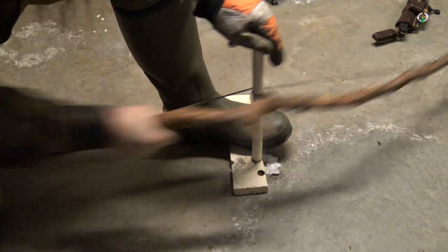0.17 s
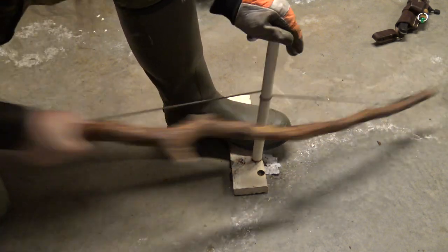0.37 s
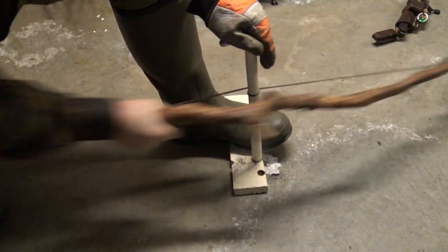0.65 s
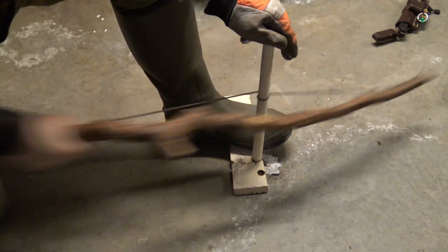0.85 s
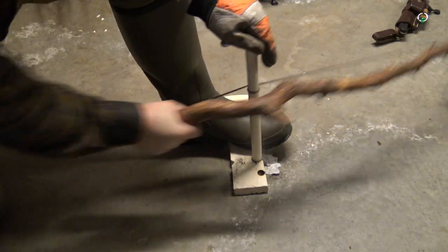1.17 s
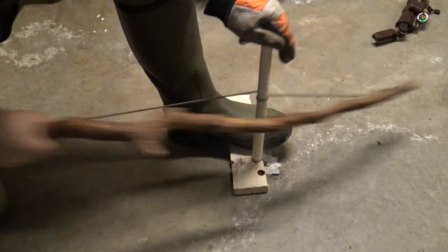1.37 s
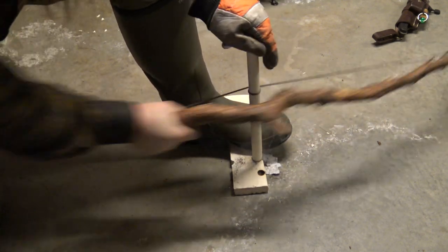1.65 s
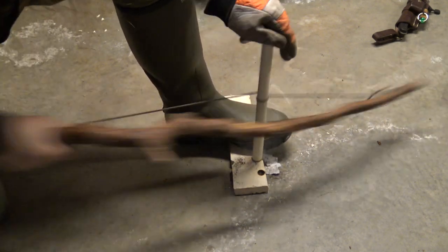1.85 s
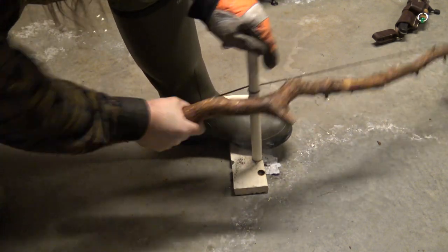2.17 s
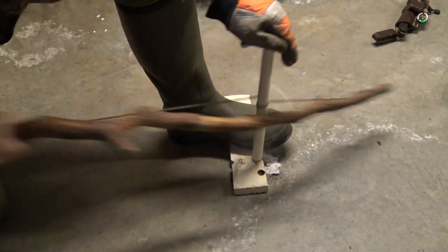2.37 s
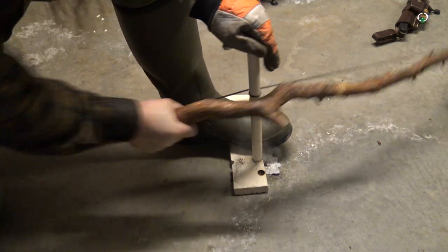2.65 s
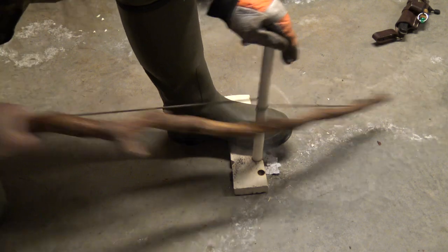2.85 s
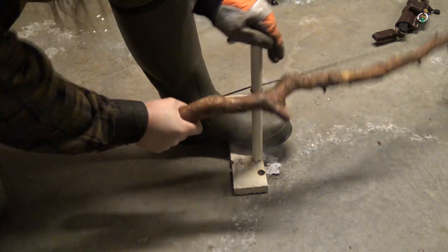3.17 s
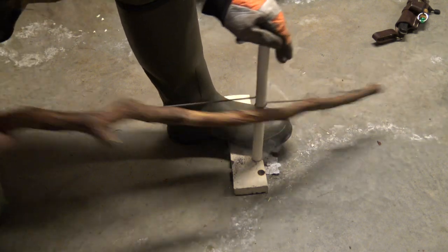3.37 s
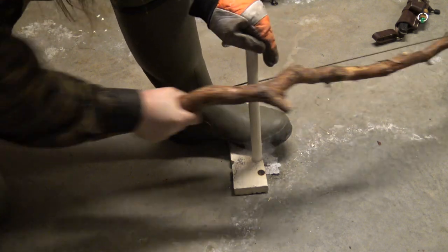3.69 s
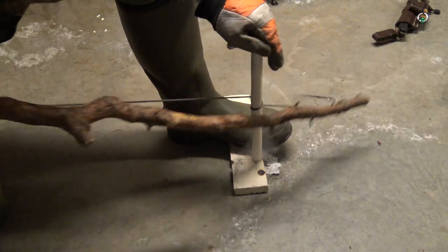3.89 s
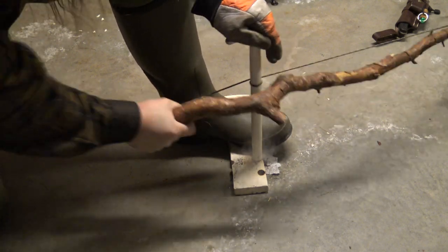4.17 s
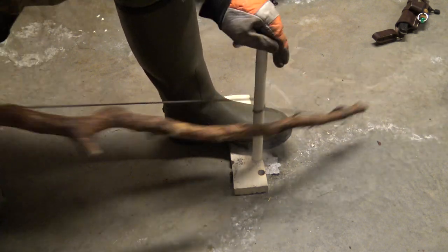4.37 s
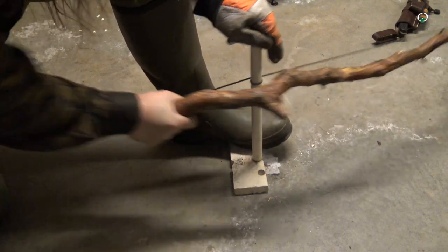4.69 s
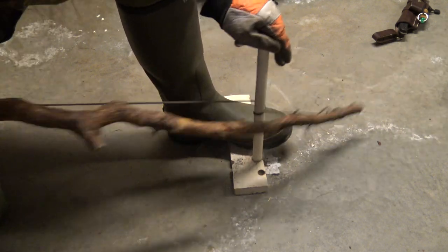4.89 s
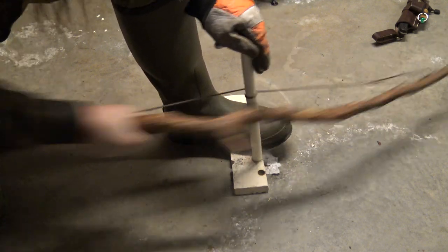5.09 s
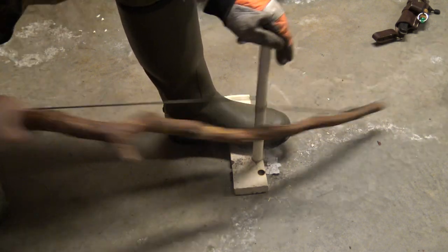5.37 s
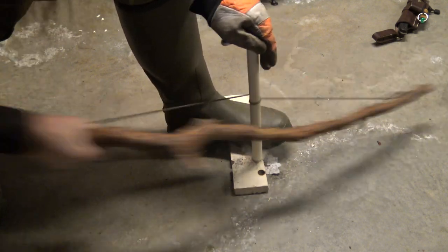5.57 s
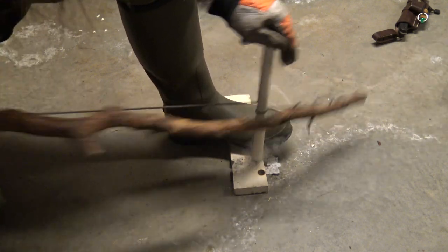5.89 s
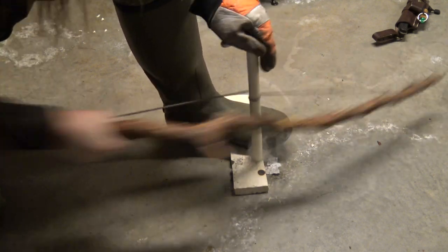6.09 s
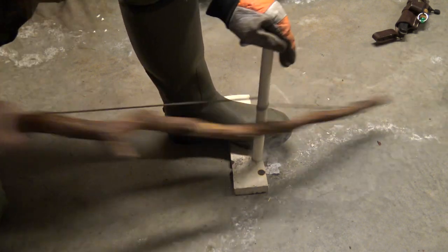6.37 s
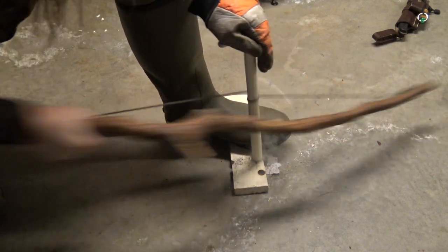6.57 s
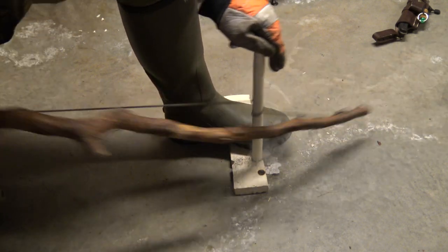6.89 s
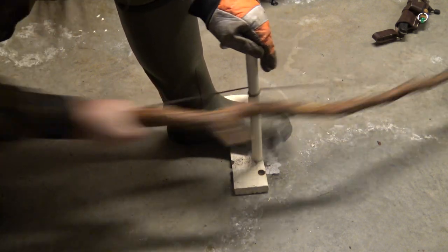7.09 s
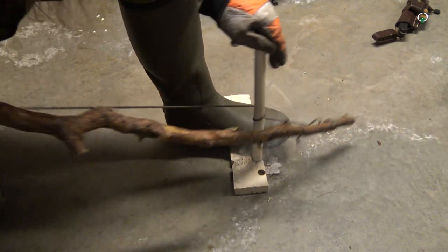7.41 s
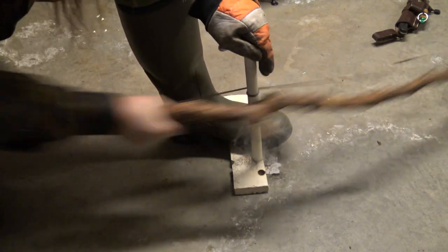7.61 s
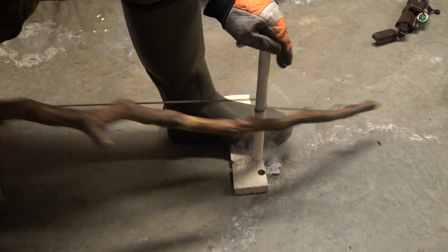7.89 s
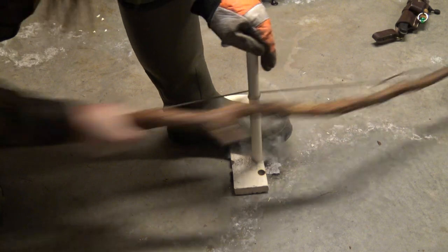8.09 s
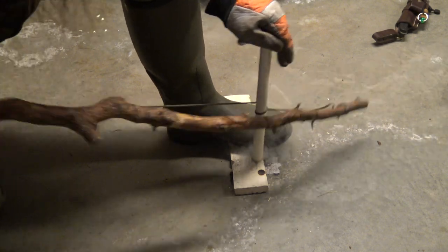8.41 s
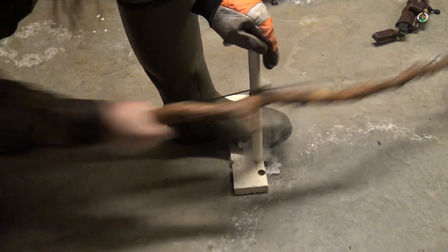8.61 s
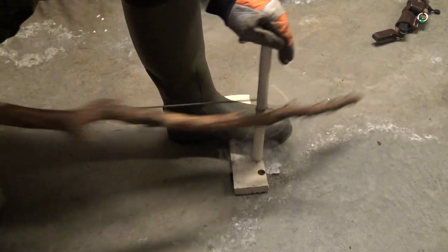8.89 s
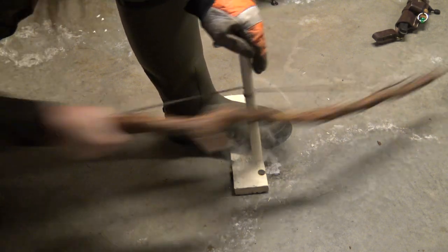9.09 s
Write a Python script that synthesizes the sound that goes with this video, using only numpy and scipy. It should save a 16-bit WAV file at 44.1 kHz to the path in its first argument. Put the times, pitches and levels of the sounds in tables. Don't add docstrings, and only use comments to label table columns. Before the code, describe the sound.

Steady, brisk sawing of wood on wood in a bare, hard room, microphone close. Each forward stroke starts with a faint airy whistle and usually breaks into a brief, raucous squeal; return strokes mostly just rasp. The earliest squeals are high and nearly pure, later ones lower, coarser and louder. A short falling groan comes near four seconds, small clicks afterward, with a short echo throughout.

```python
import sys
import numpy as np
from scipy import signal
from scipy.fft import rfft, irfft, next_fast_len
from scipy.io import wavfile
from scipy.ndimage import uniform_filter1d, minimum_filter1d, map_coordinates

SR = 44100
rng = np.random.default_rng(int(sys.argv[2]) if len(sys.argv) > 2 else 0)


def voltage_ratio(level):
    return 10 ** (np.asarray(level, float) / 20)


def persist_wave(psi):
    counts = np.round(np.clip(psi, -1, 1) * 32767).astype(np.int16)
    wavfile.write(sys.argv[1], SR, np.atleast_2d(counts).T)


N = 407925

# full strength t/s, hold t/s, fundamental level/dB, second partial level/dB,
# swell over the hold level/dB
LOW_SQUEALS = [(0.714, 0.083, -19, -17.5, -2.5), (1.192, 0.077, -23, -19, 1),
               (1.703, 0.066, -24.5, -24, 0.5), (2.182, 0.094, -19, -17, -3), (2.66, 0.07, -41, -44, 15.5),
               (3.184, 0.11, -16, -16.5, -4.5), (3.661, 0.079, -15, -16, -2.5),
               (4.148, 0.072, -14, -13.5, -1), (4.641, 0.071, -16.5, -16, 1.5), (5.19, 0.053, -12, -14, -4),
               (5.672, 0.065, -37, -36, 15.5), (6.183, 0.095, -13.5, -14, 0.5),
               (6.673, 0.063, -13.5, -13, 4), (7.169, 0.11, -15, -13, -2), (7.688, 0.077, -9, -12.5, -7.5),
               (8.204, 0.062, -14.5, -19, -2.5), (8.678, 0.08, -10, -10.5, -2.5),
               (9.169, 0.12, -16, -16.5, -4)]
# t/s, f/Hz, share of chaotic slips (0-1), upper partials relative to the second level/dB
SLIPS_FREE = [(0.714, 1040, 0.01, -2), (1.188, 1046, 0.54, -3), (1.696, 1078, 0.91, 0),
              (2.191, 1057, 0.25, -4), (2.9, 1210, 0.01, -23), (3.186, 1104, 0.02, -10.5),
              (3.666, 1036, 0.64, -7), (4.141, 1109, 0.04, -13.5), (4.639, 1066, 0.48, -9),
              (5.189, 1118, 0.05, -14), (5.91, 1180, 0.22, -1), (6.205, 1122, 0, -13),
              (6.673, 1046, 0.25, -8), (7.169, 1037, 0.4, -7.5), (7.69, 1068, 0.32, -11.5),
              (8.204, 1034, 0.54, -8), (8.68, 1100, 0.11, -12), (9.168, 975, 0.48, -2.5)]
BUILD_UPS = [.07, .05, 0.019, .045, .06, .095, .055, .055, .045, .065, 0.053, .06, .055, 0.062, 0.079,
             0.076, 0.045, .055]
# multiple of the pitch, level/dB
LOW_PARTIALS = [(3, -2), (4, -2.5), (5, -12.5), (6, -16), (7, -24), (8, -23.5), (9, -35), (10, -33.5),
                (11, -39)]

# full strength t/s, hold t/s, f/Hz, level/dB, dying t/s
MIDDLE_SQUEALS = [(0.252, .005, 1965, -28.5, 0.14), (1.64, .03, 1950, -39.5, .012),
                  (1.68, 0.019, 1915, -14.5, 0.33), (2.644, 0.0082, 2005, -29.5, .3),
                  (4.105, 0.041, 1935, -27.5, .012), (5.138, .05, 1975, -27, 0.014),
                  (5.38, .006, 1970, -13, 0.15), (5.65, 0.038, 1975, -35.5, 0.13),
                  (6.11, 0.014, 1870, -28.5, 0.15), (6.36, .008, 1930, -29.5, .2),
                  (8.168, 0.016, 1910, -13, 0.16)]
# full strength t/s, hold t/s, f/Hz, level/dB, dying t/s
HIGH_SQUEALS = [
    (0.004, 0.043, 2856, -37.5, 0.069),
    (0.218, 0.032, 2996, -12, 0.24),
    (0.422, 0.04, 2877, -11.5, 0.18),
    (0.962, 0.019, 2875, -10, 0.17),
    (1.925, 0.01, 2870, -20.5, 0.025),
    (1.952, 0.026, 2868, -15, 0.16),
]
# full strength t/s, hold t/s, f/Hz, level/dB, dying t/s
RETURN_SQUEALS = [
    (2.916, 0.0067, 1620, -38, .13),
    (3.382, 0.0077, 1707, -28, 0.13),
    (3.86, 0.068, 1625, -34, .07),
    (4.35, 0.062, 1576, -48, .05),
    (6.39, .02, 1630, -44, .12),
    (8.86, .011, 1690, -35, .15),
]
# multiple of the pitch, level/dB
OVERTONE_LEVELS = [(2, -15.5), (3, -29), (4, -48)]

# t/s, board rumble level/dB, dust hiss level/dB
FORWARD_STROKES = [(0.23, -55.5, -50.5), (0.74, -60, -47), (1.21, -49, -49.5), (1.72, -49, -44.5),
                   (2.19, -50.5, -51), (2.68, -52, -49), (3.17, -49, -46), (3.66, -44, -45),
                   (4.13, -39.5, -42.5), (4.66, -43, -44), (5.18, -47.5, -44.5), (5.69, -48, -44.5),
                   (6.18, -44.5, -42.5), (6.7, -42, -40), (7.19, -45.5, -40), (7.68, -39.5, -45),
                   (8.19, -43, -43), (8.7, -41, -39), (9.17, -43.5, -44)]
# t/s, board rumble level/dB, dust hiss level/dB
RETURN_STROKES = [(0.0, -51.5, -49.5), (0.46, -53, -52), (0.98, -51.5, -50.5), (1.47, -50.5, -51.5),
                  (1.96, -51.5, -50.5), (2.45, -47.5, -50.5), (2.91, -45.5, -48), (3.42, -46, -45.5),
                  (3.9, -40, -44.5), (4.42, -41.5, -45), (4.92, -43.5, -45.5), (5.44, -45.5, -45),
                  (5.94, -39.5, -43), (6.46, -36, -43), (6.93, -43, -44), (7.46, -44, -47),
                  (7.95, -38, -43.5), (8.44, -33.5, -43.5), (8.94, -37.5, -44.5)]
# lead t/s, rise in dB per s, fall in dB per s
FORWARD_RISE_FALL = [(0.003, 120, 112), (.008, 114, 123)]
RETURN_RISE_FALL = [(0.004, 124, 127), (0.028, 119, 116)]
# f/Hz, width f/Hz, level/dB
BOARD_RESONANCES = [(343, 240, -7), (797, 81, 5.5), (1605, 400, 8.5), (2022, 97, 15.5), (2430, 750, -21),
                    (4390, 430, 3), (6960, 190, -26), (7920, 260, -2.5)]
# f/Hz, level/dB
RUMBLE_COLOUR = [(15, -66), (25, -40), (65, 0), (293, -4.5), (360, 1.5), (399, -3.5), (1170, -2.5),
                 (1380, -3.5), (3500, -24), (4550, -70), (7700, -120)]
# f/Hz, level/dB
HISS_COLOUR = [(1500, -19.5), (2600, -2), (3500, -10), (4400, -3), (5000, -10), (6500, -10), (7000, -16.5),
               (8300, -16.5), (12000, -27), (15600, -34)]

# full strength t/s, hold t/s, level/dB
WHISTLES = [(0.21, 0.083, -47), (0.622, .04, -47.5), (1.128, 0.094, -46), (1.595, .075, -53),
            (2.1, .085, -50), (2.596, 0.073, -46), (3.085, 0.117, -43), (3.56, 0.065, -45),
            (4.066, .065, -49), (4.583, 0.038, -43), (5.112, 0.1, -41), (5.615, 0.065, -40.5),
            (6.143, 0.054, -36.5), (6.622, .042, -42), (7.125, .055, -44), (7.597, 0.021, -40),
            (8.112, 0.14, -40.5), (8.619, .082, -41.5), (9.099, 0.22, -44.5)]
# t/s, centre f/Hz, level/dB
GROANS = [
    [(3.97, 882, -48), (4.04, 785, -38), (4.1, 631, -37.5), (4.15, 494, -55)],
]
# t/s, peak level/dB
TIP_JOLTS = [(0.247, -32), (0.411, -38), (0.708, -35.5), (1.188, -40.5), (1.7, -42), (2.188, -32.5),
             (3.189, -35), (3.667, -40), (4.138, -35), (4.642, -44.5), (6.189, -31), (6.667, -29),
             (7.172, -37), (7.69, -48), (8.675, -32), (9.167, -35)]
# t/s, peak level/dB
CORD_TICKS = [
    (2.7701, -39),
    (3.5528, -48),
    (5.7808, -35),
    (6.549, -32),
    (7.0589, -34),
    (9.0134, -27),
]

# f/Hz, t/s
WALL_RING = [(200, 0.34), (1000, 0.48), (3000, 0.44), (10000, 0.38)]
# f/Hz, side minus mid level/dB
ECHO_SPREAD = [(40, -28), (180, -12.5), (550, -19), (1650, -22.5), (4970, -22.5), (8500, -6), (11000, -20),
               (14000, -8)]
# f/Hz, left minus right level/dB
SIDE_BALANCE = [(60, -3), (180, 1), (550, 2), (1650, -1.5), (4970, -1), (15000, 0.5)]


def unit(x):
    return x / np.sqrt(np.mean(x ** 2) + 1e-20)


def along(points, hz):
    f, v = np.transpose(points)
    return np.interp(np.log(hz + 1), np.log(f + 1), v)


def wobble(rate, size=N, count=6000):
    knots = rng.standard_normal(count)
    return map_coordinates(knots, [np.arange(size) * rate / SR], mode="wrap")


def filtered(x, response):
    m = next_fast_len(N + SR // 2)
    return irfft(rfft(x, m) * response(np.fft.rfftfreq(m, 1 / SR)), m)[..., :N]


def modes(table):
    def response(f):
        total = 0
        for k, (centre, width, db) in enumerate(table):
            damping = 1j * f * width
            total = total + (-1) ** k * voltage_ratio(db) * damping / (centre * centre - f * f + damping)
        return total
    return response


def arch(s, hold, rise_s, fall_s, peaks_db, swell_db, depth_db, *steady):
    rise_db, fall_db = np.array(depth_db[0]), np.array(depth_db[1])
    moments = [(s - rise_s, -rise_db), (s, 0), (s + hold, swell_db), (s + hold + fall_s, swell_db - fall_db)]
    return [(t, *steady, *(db + np.asarray(peaks_db))) for t, db in moments]


def stroke(rows):
    s, *cols = np.transpose(rows)
    start = max(round(s[0] * SR), 0)
    t = np.arange(start, min(round(s[-1] * SR), N)) / SR
    fade = np.clip(np.minimum(t - s[0], s[-1] - t) / 0.005, 0, 1)
    return slice(start, start + len(t)), fade, [np.interp(t, s, c) for c in cols]


def slip_phase(hz, shake):
    size = len(hz)
    wander = wobble(170, size=size, count=300) + wobble(398.6, size=size, count=300)
    return 2 * np.pi * np.cumsum(hz * (1 + shake * wander)) / SR


def partial(phase, rate, steady):
    a = wobble(rate, size=len(phase), count=300)
    b = wobble(rate, size=len(phase), count=300)
    return unit((steady + a) * np.sin(phase) + b * np.cos(phase))


def dying(level_db):
    drop_db = np.maximum.accumulate(level_db) - level_db
    return level_db - 0.76 * np.clip(drop_db - 2.5, 0, 40)


def low_squeal():
    stuck_hz, fall_s = 1191.5, 0.17
    out = np.zeros(N)
    for squeal, slip, rise_s in zip(LOW_SQUEALS, SLIPS_FREE, BUILD_UPS):
        s, hold, *peaks_db, swell_db = squeal
        free, hz, chaos, upper_db = slip
        rows = arch(s, hold, rise_s, fall_s, peaks_db, swell_db, ([35.6, 17], [23.3, 24.2]))
        at, fade, (first_db, second_db) = stroke(rows)
        t = np.arange(at.start, at.stop) / SR - free
        stuck = np.clip(-t / 0.01788, 0, 1)
        pitch = hz + (stuck_hz - hz) * stuck
        even = slip_phase(pitch, 0.01283 * (1 - 0.62 * stuck))
        ragged = slip_phase(pitch, 0.055)
        chaos = np.clip(0.023 + 0.59 * chaos, 0, 1)

        def line(k, rate):
            regular = np.sqrt(1 - chaos) * partial(k * even, rate, steady=0.45)
            return regular + np.sqrt(2 * chaos) * np.sin(k * ragged)

        first = partial(even, 145 + 120 * chaos, steady=0.62 + 0.81 * stuck)
        first = first + 0.54 * np.sqrt(chaos) * np.sin(ragged)
        tone = voltage_ratio(dying(first_db) - 1.7 * stuck) * first
        second = line(2, 149.0) * np.clip((1 - stuck) ** 0.81, 0.07, 1)
        burst = np.clip(t / 0.0026 + 1, 0.01, 1)
        upper = sum(voltage_ratio(db) * line(k, 231.05) for k, db in LOW_PARTIALS)
        rich = second + voltage_ratio(upper_db + 0.5) * burst * upper
        out[at] += fade * (tone + voltage_ratio(dying(second_db)) * rich)
    return out


def mode_squeal(table, shake, full_db, rise_s):
    settle_s, sharp_start, rough_start = 0.0535, 0.01, 0.7
    out = np.zeros(N)
    for s, hold, pitch, db, fall_s in table:
        at, fade, (hz, level_db) = stroke(arch(s, hold, rise_s, fall_s, [db], -1.15, (28, 25), pitch))
        fresh = np.exp(-np.abs(np.arange(at.start, at.stop) / SR - s) / settle_s)
        bent_hz = hz * (1 + sharp_start * (fresh - 0.3))
        phase = slip_phase(bent_hz, shake * (0.852 + rough_start * fresh))
        drive_db = np.clip(np.maximum.accumulate(level_db) - full_db, -12, 0)
        overtones = sum(voltage_ratio(over_db + 2.1 * drive_db) * partial(k * phase, 247.8, steady=0.78)
                        for k, over_db in OVERTONE_LEVELS)
        out[at] += fade * voltage_ratio(dying(level_db)) * (partial(phase, 167.9, steady=0.35) + overtones)
    return out


def grit(density, spread_db):
    breaks = rng.random(N) < density / SR
    size = np.minimum(rng.exponential(size=N), 3.5)
    push = rng.standard_normal(N)
    fine = rng.standard_normal(N)
    return 0.59 * unit(breaks * voltage_ratio(spread_db * size) * push) + fine


def bowing(column):
    bend, bend_s = 0.63, 0.1
    t = np.arange(0, N + 64, 64) / SR
    out = []
    for table, slopes in (FORWARD_STROKES, FORWARD_RISE_FALL), (RETURN_STROKES, RETURN_RISE_FALL):
        lead, rise, fall = slopes[column]
        rows = np.array(table)
        since = t - rows[:, :1] + lead
        drop_db = np.maximum(-rise * since, fall * since) * (np.abs(since) / bend_s) ** bend
        out.extend(rows[:, column + 1:column + 2] - drop_db)
    return np.interp(np.arange(N) / SR, t, np.max(out, axis=0))


def rasp():
    rumble_db, hiss_db = bowing(0), bowing(1)
    chatter = wobble(70)
    low = unit(filtered(grit(900, 3.6), lambda f: voltage_ratio(along(RUMBLE_COLOUR, f))))
    wood = unit(filtered(grit(1200, 6.6), modes(BOARD_RESONANCES)))
    hiss = unit(filtered(grit(4200, 2.7), lambda f: voltage_ratio(along(HISS_COLOUR, f))))
    low_db = rumble_db - 1.5 + 0.88 * wobble(19) + 0.32 * chatter
    wood_db = 0.62 * rumble_db + 0.42 * hiss_db + 5.5 + 2.9 * wobble(32) + 1.64 * chatter
    return voltage_ratio(low_db) * low + voltage_ratio(wood_db) * wood + voltage_ratio(hiss_db + 9.5 + 0.5 * chatter) * hiss


def whistle():
    out = np.zeros(N)
    for s, hold, db in WHISTLES:
        at, fade, (level_db,) = stroke(arch(s, hold, 0.02, 0.029, [db], 0.3, (12, 11)))
        hz = np.linspace(4850, 4680, len(fade))
        out[at] += fade * voltage_ratio(level_db + 2.0) * partial(slip_phase(hz, 0.0142), 300, steady=0.085)
    return out


def groan():
    out = np.zeros(N)
    for rows in GROANS:
        at, fade, (hz, level_db) = stroke(rows)
        out[at] += fade * voltage_ratio(level_db) * partial(slip_phase(hz, 0.22), 521.0, steady=0.1)
    return out


def jolts():
    out, t = np.zeros(N + SR), np.arange(SR // 20) / SR
    push = (1 - t / 0.0035) * np.exp(-t / 0.0023) * (1 - np.exp(-t / 0.0011))
    for s, db in TIP_JOLTS:
        splinters = uniform_filter1d(rng.standard_normal(len(t)), size=4)
        puff = 0.5 * voltage_ratio(-60 * t / 0.015) * splinters
        out[round(s * SR):][:len(t)] += voltage_ratio(db + 8.0) * (push + puff)
    return out[:N]


def ticks():
    out, t = np.zeros(N + SR), np.arange(SR // 100) / SR
    for s, db in CORD_TICKS:
        bright = np.diff(rng.standard_normal(len(t) + 2), n=2)
        out[round(s * SR):][:len(t)] += voltage_ratio(db - 16) * bright * voltage_ratio(-60 * t / 0.014)
    return out[:N]


def room(x):
    step = SR // 2
    out = np.zeros((2, N + 2 * SR))
    x = np.pad(x, (step, 2 * step))
    for start in range(0, N + step, step):
        hz, t, z = signal.stft(rng.standard_normal((2, SR // 2)), SR, nperseg=256)
        t60 = along(WALL_RING, hz)[:, None]
        tail = signal.istft(z * voltage_ratio(-60 * t / t60) / np.sqrt(t60), SR, nperseg=256)[1]
        piece = x[start:start + 2 * step] * np.sqrt(np.hanning(2 * step))
        wet = signal.fftconvolve(piece[None], tail / np.linalg.norm(tail[0]), axes=1)
        out[:, start:start + wet.shape[1]] += wet[:, :out.shape[1] - start]
    return out[:, step - 150:step - 150 + N]


def faint_floor():
    return voltage_ratio(-57) * uniform_filter1d(rng.standard_normal(N), size=2)


def scene():
    squeals = low_squeal()
    squeals += mode_squeal(MIDDLE_SQUEALS, 0.0243, -10.5, rise_s=0.022)
    squeals += mode_squeal(HIGH_SQUEALS, 0.0142, -13.0, rise_s=0.033)
    squeals += mode_squeal(RETURN_SQUEALS, 0.024, -14, rise_s=0.08)
    drill = squeals + rasp() + whistle() + groan() + jolts() + ticks()
    shared, differing = room(drill)
    mid = voltage_ratio(2.0) * drill + voltage_ratio(-1.0) * shared + faint_floor()
    side = filtered(differing, lambda f: voltage_ratio(along(ECHO_SPREAD, f) - 0.5))
    halves = np.array([[0.5], [-0.5]])
    return filtered(np.array([mid + side, mid - side]), lambda f: voltage_ratio(halves * along(SIDE_BALANCE, f)))


def band_limit(x):
    return signal.sosfilt(signal.butter(12, 15770, fs=SR, output="sos"), x)


def record(dry):
    dry = filtered(dry, lambda f: 1j * f / (45 + 1j * f))
    need = np.minimum(1, voltage_ratio(-3) / (np.abs(dry).max(0) + 1e-9)) ** 0.9
    held = minimum_filter1d(need, size=1800, origin=750)
    mix = dry * uniform_filter1d(held, size=300)
    return band_limit(mix)


dry = scene()
out = record(dry)
persist_wave(out)
```